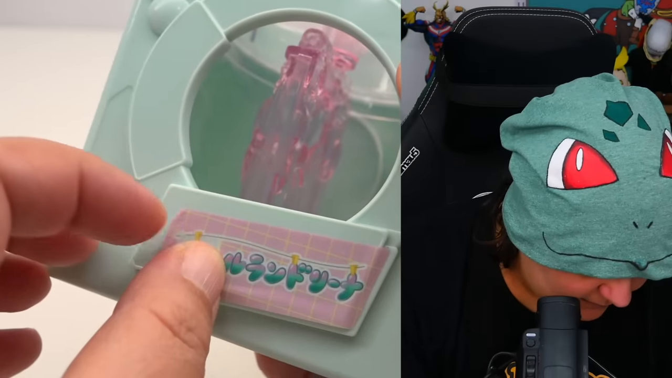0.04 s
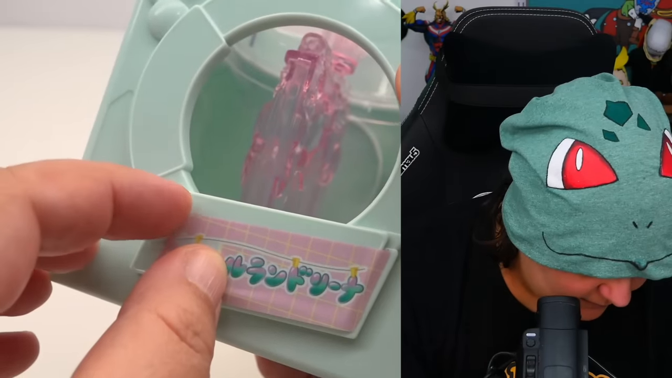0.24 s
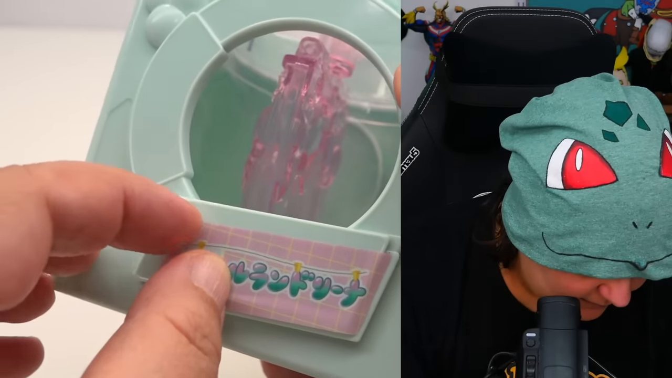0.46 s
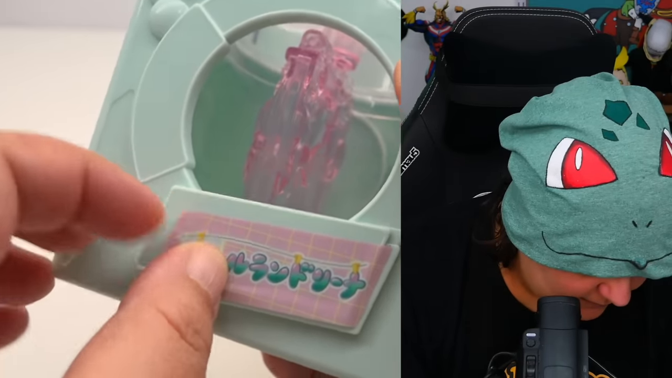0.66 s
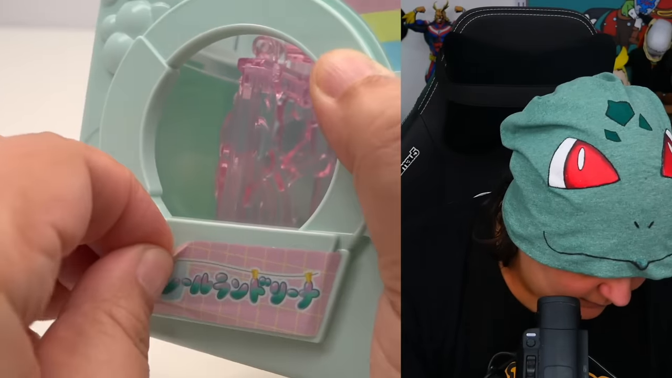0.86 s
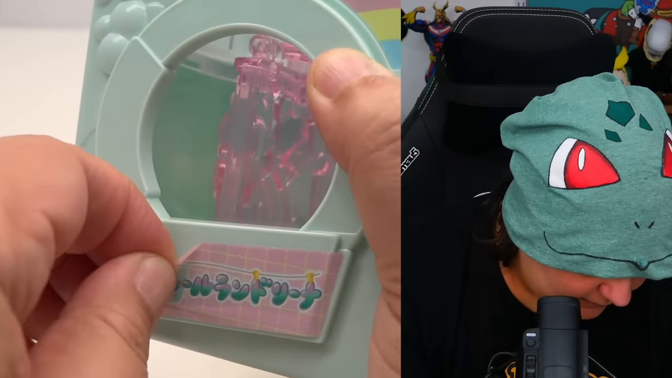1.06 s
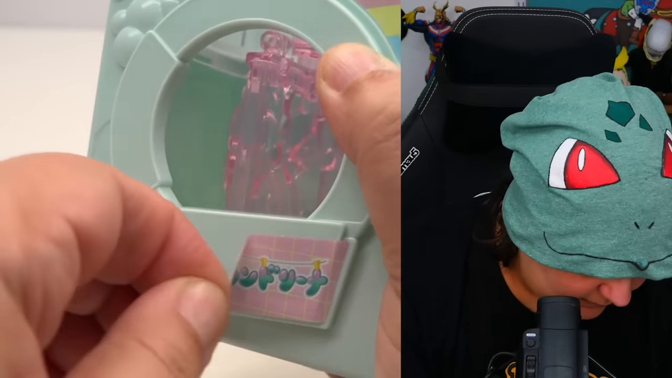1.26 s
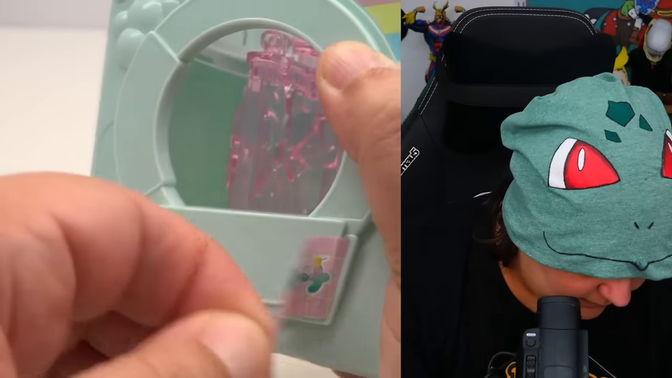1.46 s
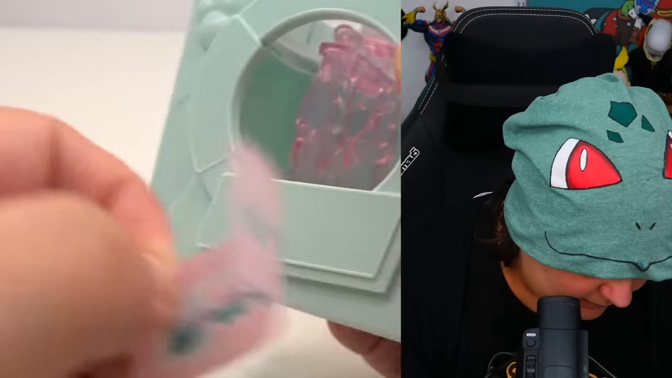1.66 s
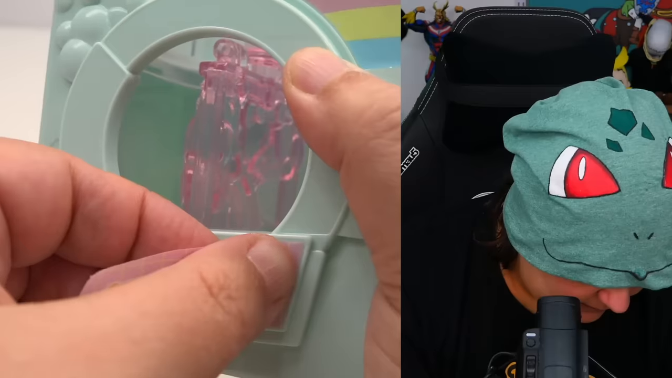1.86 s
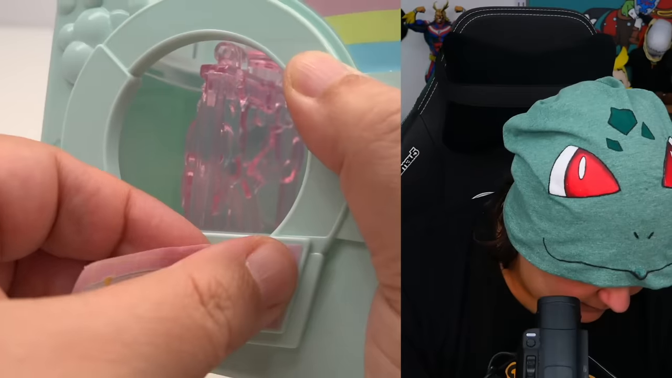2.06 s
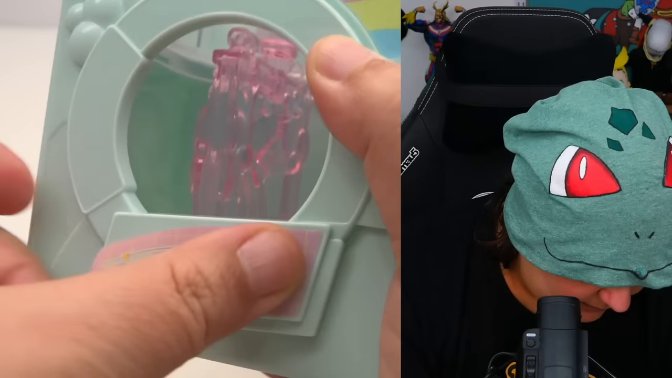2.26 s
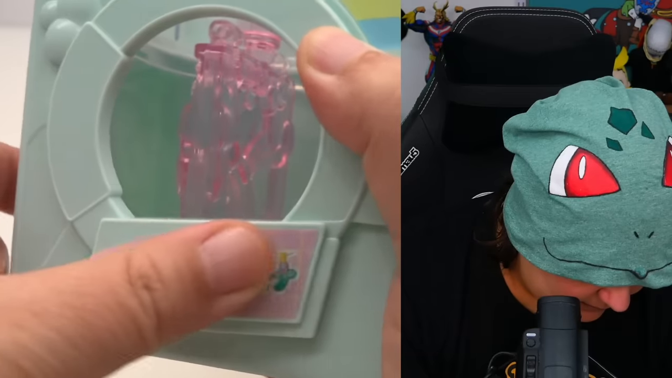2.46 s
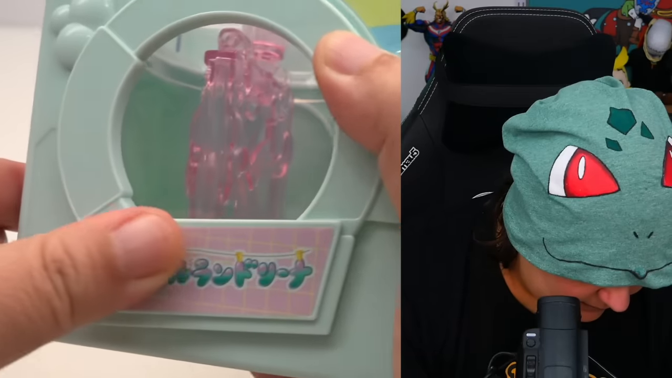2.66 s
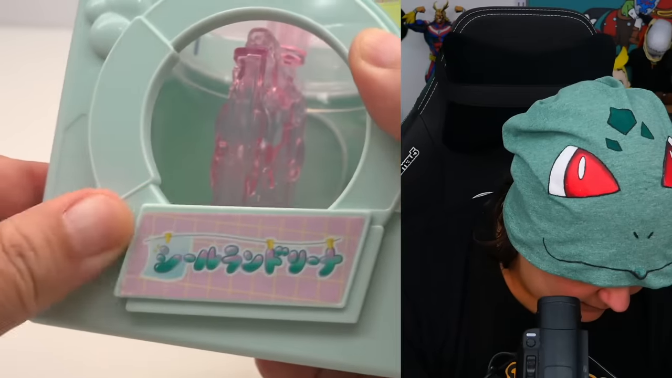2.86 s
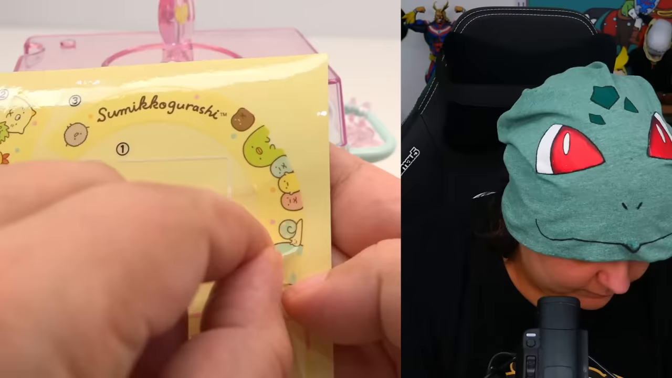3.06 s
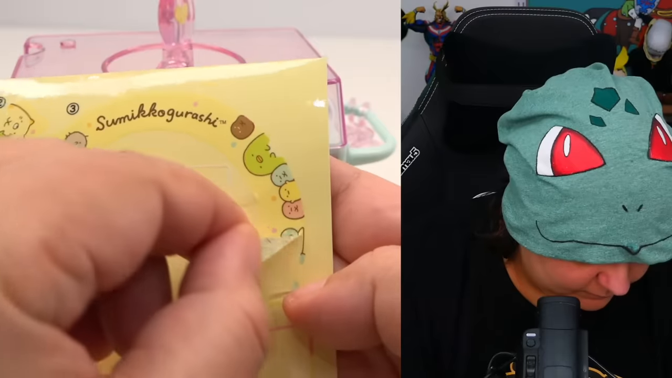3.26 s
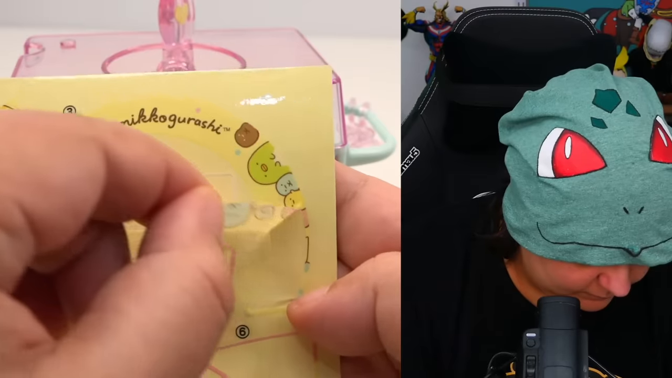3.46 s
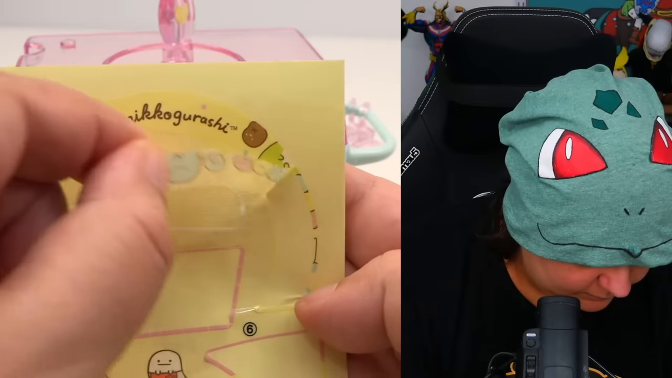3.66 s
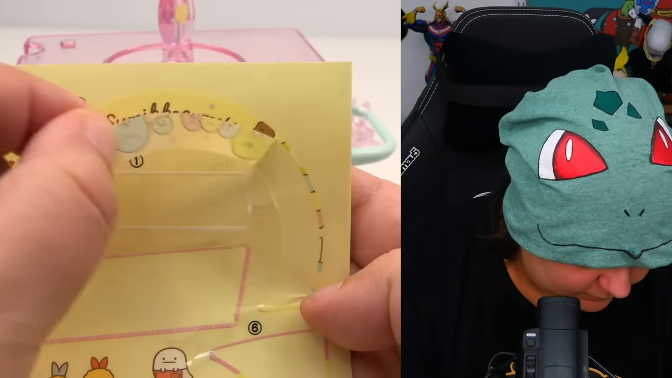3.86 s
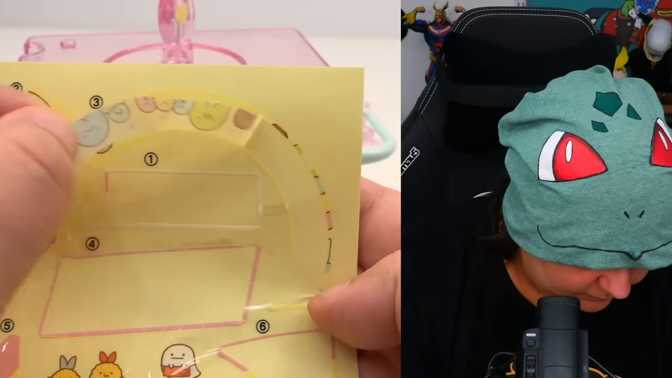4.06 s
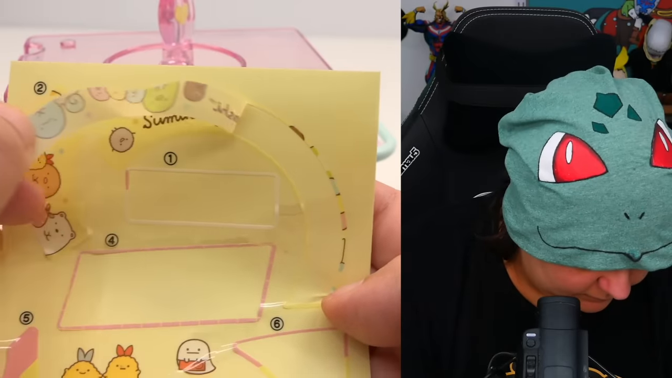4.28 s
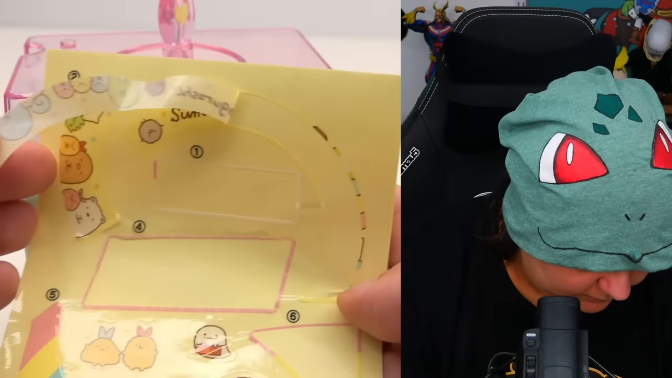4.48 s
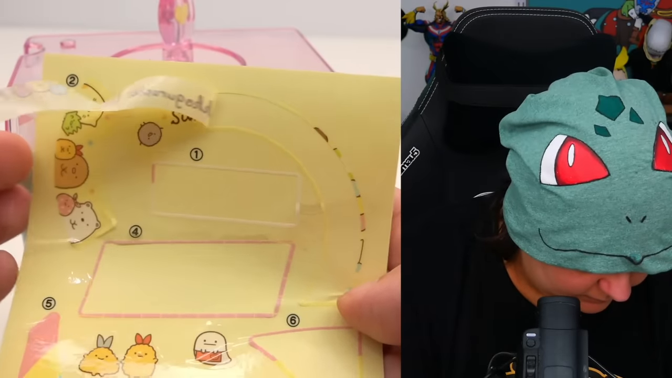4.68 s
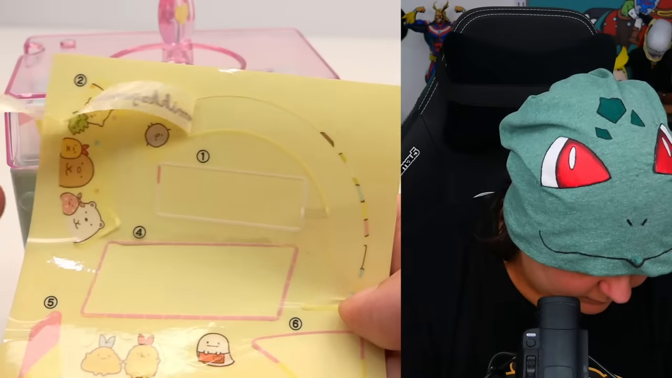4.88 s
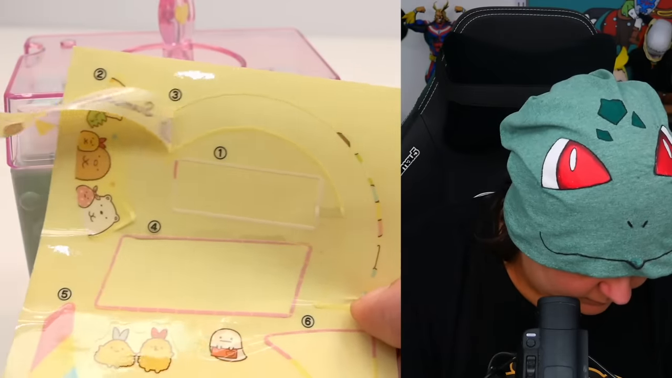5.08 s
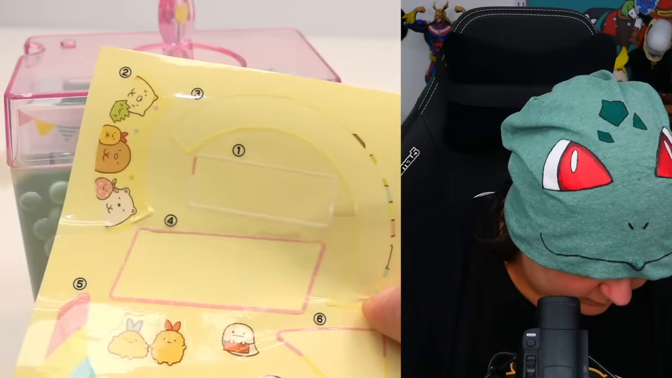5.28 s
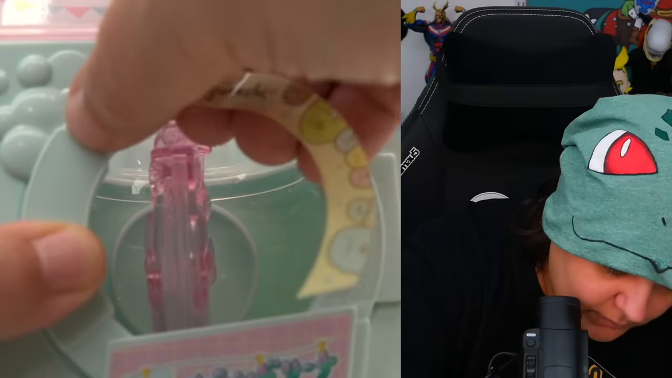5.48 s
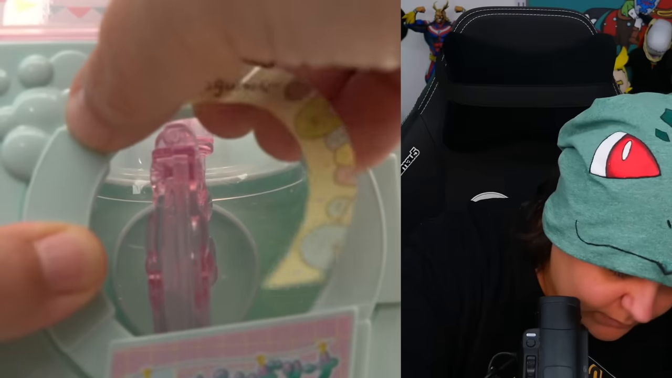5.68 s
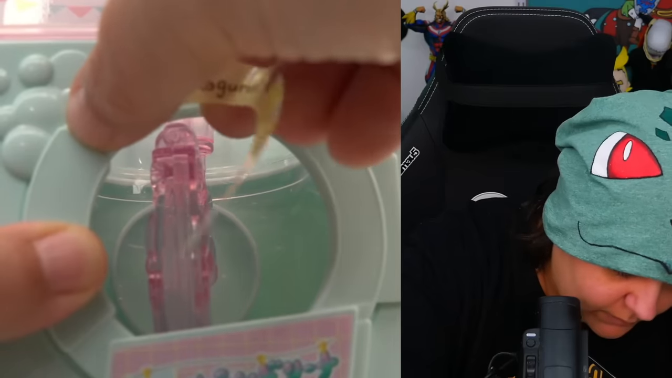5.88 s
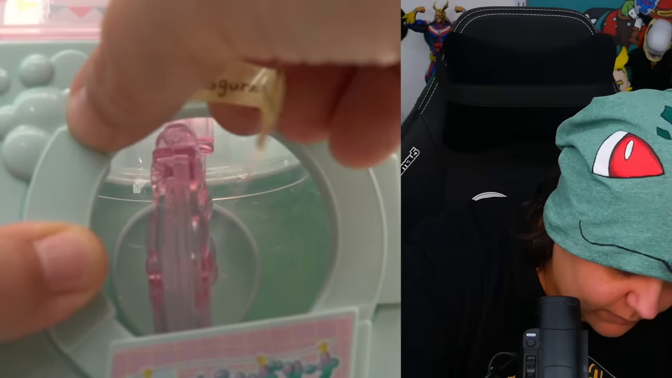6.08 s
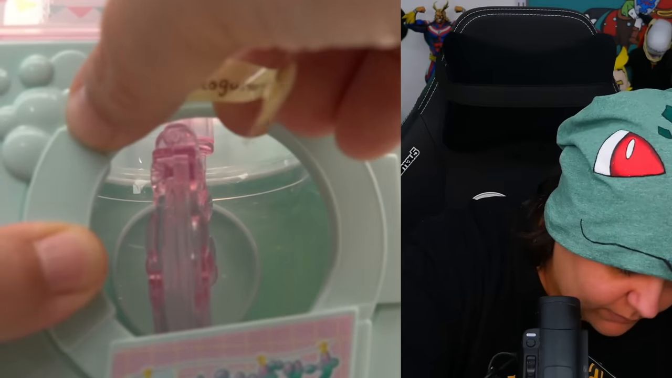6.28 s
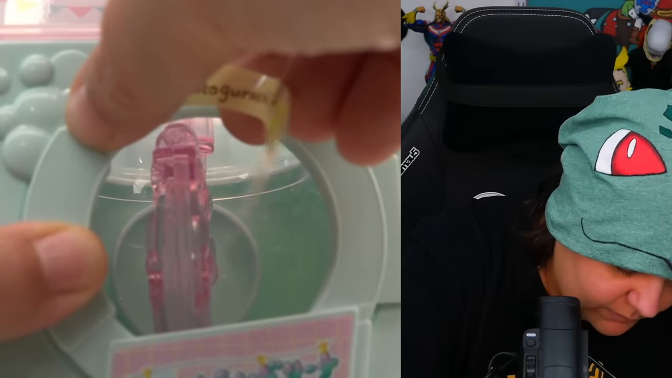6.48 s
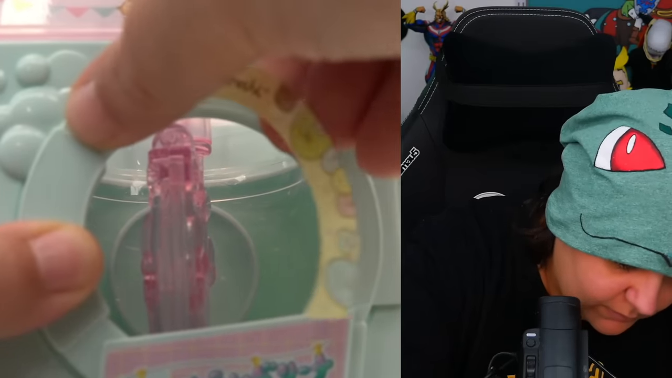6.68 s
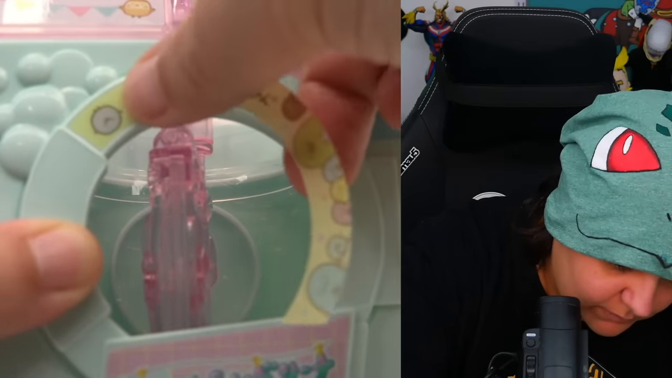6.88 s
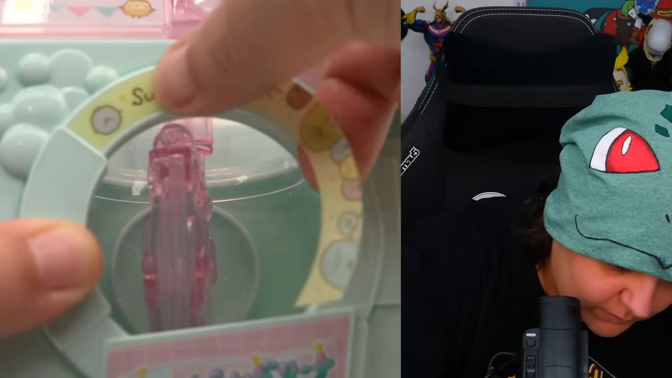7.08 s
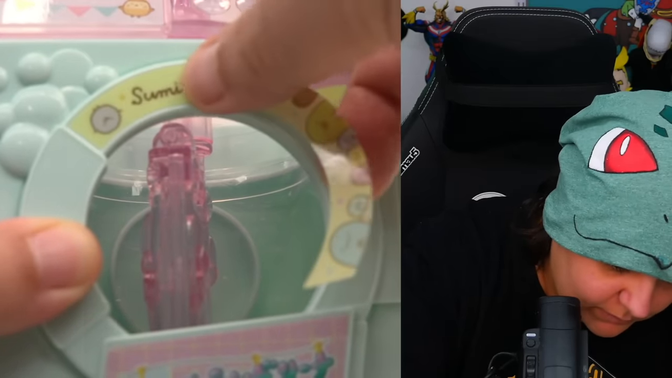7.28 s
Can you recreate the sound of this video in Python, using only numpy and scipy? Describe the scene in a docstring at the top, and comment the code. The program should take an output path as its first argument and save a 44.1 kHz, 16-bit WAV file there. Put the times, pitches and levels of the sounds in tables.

```python
"""A label is peeled off a hollow plastic toy close to a desk microphone, flicks free and is pressed back on.
A long sticker then lets go of its stiff backing sheet in a run of snaps, and the toy is picked up and bumped.
Breaking glue threads are random impulses and hiss, snaps and knocks are noise bursts through resonances,
rubbing fingers are tiny slips, and the desk booms as low sines. A small, dry room adds a tail and a floor."""
import sys
import numpy as np
from scipy import signal
from scipy.fft import rfft, irfft
from scipy.io import wavfile
from scipy.ndimage import uniform_filter1d

SR = 44100
rng = np.random.default_rng(int(sys.argv[2]) if len(sys.argv) > 2 else 0)


def transcribe(signal):
    """Save signal, clipped to [-1, 1], as a 16-bit WAV file at the path in sys.argv[1]."""
    frames = np.atleast_2d(signal).T
    limited = np.clip(frames, -1, 1)
    pcm = np.round(limited * 32767).astype(np.int16)
    wavfile.write(sys.argv[1], SR, pcm)


N = 323678
TIME = np.arange(N) / SR

# single snaps of glue and sheet, late film crinkles and a faint tick:
# [t/s, relative level/dB, body/dB, top/dB, resonance f/Hz]
SINGLE_SNAPS = [(1.161, 0.5, -20, 3, 4200), (1.183, -4, -22, 5, 4150), (1.1893, -3, -16, 0, 4100),
                (1.4394, -6, 2, 14.5, 1903), (1.52, 11, -3, -4, 5086), (3.1971, -2.5, 6.5, -16, 4440),
                (3.2282, -10, 2, 6, 5150), (3.234, 7, 6.5, -14.5, 5060), (3.258, 6, 8.5, -14, 5000),
                (3.275, -0.5, -10, -3, 5080), (3.282, 4.5, 8, -10, 4940), (3.299, -0.5, -5, -3, 5150),
                (3.307, -4.5, 10.5, -7, 4940), (3.341, -4, 12, -5, 1060), (3.3493, -4.5, 12, 0.5, 5100),
                (3.3934, -8, 6, -10, 5000), (3.43, -5, 2, 2.5, 5160), (3.486, 0, 11, 7.5, 4900),
                (3.5174, -5, -6, -8, 1018), (3.521, 0, -1, -7, 1020), (3.5582, -3, -19, 0, 4880),
                (3.6422, -0.5, -2, -2, 5100), (3.7005, -7.5, 10, 4.5, 4700), (3.8011, -5.5, 9, 0, 4900),
                (3.819, -8.5, 8, -1, 4790), (3.8701, -5.5, 5, 11.5, 3100), (3.902, -8, -1, 9.5, 3040),
                (3.937, -9, 2.5, 1, 1240), (3.9682, -7, 4, 9, 5000), (4.111, -5.5, -1, 5.5, 1500),
                (4.1784, -8, -8, -4, 1130), (4.2029, -5.5, -3.5, -6, 1130), (4.2614, -8, 8, 2, 3770),
                (4.3114, -8.5, 8, 3.5, 2000), (4.4072, -10, 9, 6.5, 3640), (4.4691, -11, 5.5, 1, 1510),
                (4.6911, -11.5, 4, 5, 1120), (4.7858, -7, 0, -1, 3900), (4.8007, -7, 1, 1, 1090),
                (4.8604, -2, 0, -3, 1050), (4.927, -10, -3, -4, 1050), (4.9382, 0.5, -2, -1, 1040),
                (4.9918, -9, 17, 4, 3750), (5.0513, -5, 5, -3, 1000), (5.058, -3, 0.5, -5, 1000),
                (5.1635, -0.5, -5, -1, 2654), (5.344, -9.5, 2, -6, 5150), (5.4328, -5, -25, 5.5, 9500),
                (5.684, -18, -16, 7, 4970), (5.696, -22, -10, 10, 7600), (6.8016, -24.5, 19, 8, 4590)]
# colour of the stiff backing sheet: [f/Hz, level/dB]
SHEET_COLOUR = [(200, -9), (700, -5), (1100, 5), (1700, -2.5), (3000, 1), (4800, -3), (6500, -9.5),
                (8400, -11.5), (11000, -21), (16000, -23)]


def label_peel():
    """The label's breaking glue threads ring the panel that it is stuck to."""
    # pulls that lift the label, then lay it back: [start t/s, hold/s, relative level/dB, top/dB]
    pulls = [(0.77, 0.17, -51, 3), (.99, 0.05, -51, 5), (1.07, .09, -44.5, 4), (1.19, 0.032, -37, -7),
             (1.25, 0.16, -46, -7), (1.48, 0.016, -31.5, -0.5), (1.535, 0.084, -46.5, 3),
             (2.01, 0.082, -50.5, -6), (2.1, 0.12, -44.5, -6)]
    # colour of the label: [f/Hz, level/dB]
    label_colour = [(300, -15.5), (1100, -4), (1650, -13), (2400, -6.5), (3700, -8.5), (5200, -5.5),
                    (7000, -8.5), (10500, -15), (14500, -8.5), (16000, -19)]
    # resonances of the label and the panel under it: [f/Hz, lift/dB, Q]
    panel = [(1984, 15.5, 13), (3305, 11, 30), (4380, 7.5, 17), (8470, 10.5, 5.6)]
    pull, top_db = strokes(pulls, attack_s=0.027, release_s=0.024)
    x = peel(pull, top_db, label_colour, threads_per_s=1100, spread_db=2.5, hiss_db=-1.5, judder_db=2.0)
    for hz, db, q in panel:
        x = resonate(x, hz, db, q)
    return amp(-7.0) * x


def sheet_peel():
    """The long sticker crackles off its stiff backing in long, steady pulls with short scrapes on top."""
    # pulls and scrapes that draw the sticker off: [start t/s, hold/s, relative level/dB, top/dB]
    pulls = [(3.11, 0.12, -55, 0), (3.22, 0.43, -47.5, 10), (3.285, 0.025, -37.5, 4), (3.62, 0.94, -54, 6),
             (4.06, 0.05, -48, -12), (4.4, .035, -49, -3), (4.61, .015, -43, 11), (4.672, 0.028, -36, -1),
             (4.95, 0.197, -43, 3), (5.1, 0.016, -38, 10), (5.163, 0.016, -33, 1)]
    pull, top_db = strokes(pulls, attack_s=0.0082, release_s=0.0064)
    x = peel(pull, top_db, SHEET_COLOUR, threads_per_s=380, spread_db=3, hiss_db=-4.5, judder_db=5)
    return amp(-5.5) * x


def peel(pull, top_db, shape, threads_per_s, spread_db, hiss_db, judder_db):
    """Glue threads break one by one and shake the film; the finest merge into a hiss, and the pull judders."""
    breaks = grains(threads_per_s, spread_db) + amp(hiss_db) * rng.standard_normal(N)
    judder = amp(judder_db * walk(110))
    crackle = unit(colour(judder * breaks, shape))
    return brighten(crackle, top_db) * pull


def snaps():
    """A patch of glue lets go: a tiny tear, a millisecond flutter, then waves running round the sheet."""
    # colour common to all snaps: [f/Hz, level/dB]
    snap_colour = [(60, -31), (300, -19.5), (700, -20.5), (1100, -9.5), (1700, -14), (3000, -6.5),
                   (5000, -6.5), (6500, -9), (8400, -7), (11000, -22), (16000, -23)]
    tear_s, spike = 0.00027, 0.69
    flutter_s, flutter_db = 0.0052, -6.5
    tail_s, tail_db = 0.0064, -13
    gain_db, ring_db, ring_q = -1, 10.5, 7
    out = np.zeros(N)
    for s, db, body_db, top_db, hz in SINGLE_SNAPS + faint_snaps():
        tear = burst(tear_s, size=3000)
        tear[0] += spike
        flutter = amp(flutter_db) * burst(flutter_s, size=3000)
        tail = amp(tail_db) * burst(tail_s, size=3000)
        kick = tear / np.linalg.norm(tear) + flutter + tail
        snap = colour(kick, snap_colour, [(1300, body_db), (4000, 0), (10500, top_db)])
        add(out, s, amp(db + gain_db) * resonate(snap, hz, ring_db, ring_q))
    return trail(out, hz=2500, q=0.94)  # bending waves delay this band


def faint_snaps():
    """Rows like SINGLE_SNAPS for small glue patches that let go at random, fewer and weaker as the peel goes on."""
    start_s, end_s, count, thinning = 3.17, 5.25, 100, 1.2
    level_db, fade_db_per_s, level_spread_db = -13.5, -4.5, 1.5
    body_db, top_db, colour_spread_db = 4, 1, 5
    # the freed strip rings lower the longer it gets
    strip_hz, strip_hold_s, octaves_per_s, scatter_octaves_per_s = 5000, 0.59, 1.59, 1.2
    gap_s = 0.012  # a short gap without faint snaps before each listed snap

    place = (np.arange(count) + rng.random(count)) / count
    size, body, top, pitch = rng.standard_normal((count, 4)).T
    age_s = (end_s - start_s) * place ** thinning
    octaves = np.maximum(age_s - strip_hold_s, 0) * (octaves_per_s + scatter_octaves_per_s * pitch)
    rows = zip(start_s + age_s,
               level_db + fade_db_per_s * age_s + level_spread_db * size,
               body_db + colour_spread_db * body,
               top_db + colour_spread_db * top,
               strip_hz / 2 ** np.clip(octaves, 0, 2.2))
    return [row for row in rows if not any(0 < listed[0] - row[0] < gap_s for listed in SINGLE_SNAPS)]


def buckle():
    """The bent sheet pops through to its other curve once: a short, hollow tock that spreads over the paper."""
    # modes of the buckling sheet: [f/Hz, level/dB, t60/s]
    modes = [(270, -38.5, 0.044), (610, -36, 0.022), (1077, -11.5, 0.013), (1460, -31, 0.042),
             (2290, -34, 0.018)]
    buckle_s, crack_db, scatter_db, scatter_s = 3.5408, -19, -10, 0.0064
    t, out = TIME[:4000], np.zeros(N)
    pop = sum(amp(db - 60 * t / t60) * np.sin(2 * np.pi * hz * t) for hz, db, t60 in modes)
    scatter = signal.fftconvolve(pop, burst(scatter_s, size=4000))[:len(t)]
    pop = pop + amp(scatter_db) * scatter
    # a light sheet radiates no deep bass
    pop = colour(pop, [(40, -37), (200, -3.0), (500, -5.5), (2600, 5.5), (4000, -15), (10000, -10)])
    crack = amp(crack_db) * colour(burst(.002, size=4000), SHEET_COLOUR)
    add(out, buckle_s, pop + crack)
    return out


def label_slide():
    """The sliding label swishes with a resonance that falls as more of it hangs free, ragged at its edges."""
    # swishes over plastic and skin: [start t/s, hold/s, level/dB]
    swishes = [(1.07, 0.06, -51.5), (1.19, 0.02, -37.5), (1.25, 0.033, -48), (1.43, 0.034, -45.5),
               (1.55, 0.006, -30), (1.6, 0.029, -43.5), (1.69, 0.025, -55), (2.1, .06, -64),
               (2.82, 0.034, -66)]
    # the free length grows from lift_s on, until the label flicks off at free_s
    lift_s, free_s, length_doubling_s = 1.165, 1.515, .085
    stuck_hz, free_hz = 8310, 5530
    slip_db, half_width_hz, skirt_hz, skirt_db = 3, 480, 1900, -7
    gain, = strokes(swishes, attack_s=0.029, release_s=0.024)
    free_length = 1 + np.maximum(TIME - lift_s, 0) / length_doubling_s
    hz = np.where(TIME < free_s, stuck_hz / free_length, free_hz)

    noise = rng.standard_normal(N) + 1j * rng.standard_normal(N)
    friction = amp(slip_db * walk(150)) * noise
    core, skirt = (signal.sosfilt(signal.butter(2, width, fs=SR, output="sos"), friction)
                   for width in (half_width_hz, skirt_hz))
    sway = core + amp(skirt_db) * np.roll(skirt, SR)  # the shift makes the skirt independent of the core
    # move the low band up to the resonance
    carrier = np.exp(2j * np.pi * np.cumsum(hz) / SR)
    return unit(np.real(sway * carrier)) * gain


def film_flex():
    """The loose sticker creeps over a fingertip in an uneven run of tiny slips."""
    # flexing in the fingers: [t/s, level/dB, top/dB]
    flexing = [(5.4, -61, 9), (5.45, -63, 11), (5.5, -74, 12), (5.56, -67, 9), (5.62, -50, -7),
               (5.66, -56.5, 1), (5.7, -72, 3), (5.76, -61, -12), (5.82, -77, 3)]
    # colour of the thin film: [f/Hz, level/dB]
    film_colour = [(800, -28), (2000, -20), (3800, -22), (5070, 2), (6040, -8), (7700, -2), (10700, -17),
                   (16000, -20)]
    slips_per_s, scatter_db, hiss_db = 110, 6.0, -8
    s, *columns = np.transpose(flexing)
    level_db, top_db = (np.interp(TIME, s, column) for column in columns)
    lasting = uniform_filter1d(1. * ((TIME >= s[0]) & (TIME <= s[-1])), size=400)  # soft edges

    cycles = np.floor(np.cumsum(slips_per_s * np.exp(0.5 * walk(81))) / SR)
    slips = unit(np.diff(cycles, prepend=0) * amp(scatter_db * walk(300)))
    x = unit(colour(slips + amp(hiss_db) * rng.standard_normal(N), film_colour))
    return brighten(x, top_db) * amp(level_db) * lasting


def knocks():
    """A brief contact, then loose parts chatter; each spot has its pitch, and soft flesh dulls the treble."""
    # blows on the toy:
    # [t/s, relative level/dB, bass/dB, low middle/dB, top/dB, resonance f/Hz, rattle decay/s]
    blows = [(0.3626, -17.5, 3, -11, -12.5, 1000, 0.024), (0.4197, -17, 15, 5.5, -33, 960, 0.0088),
             (0.5208, 9.5, 4, -6, -25.5, 856, 0.014), (0.568, -7.5, -16, 4, -30, 670, .009),
             (0.592, -10.5, 1, 10, -35, 747, 0.013), (0.629, -12, -8, 9, -27, 1320, 0.011),
             (1.4563, 11, -14, -12.5, -8, 2000, 0.012), (1.5286, 0.5, -1.5, 6, 4.5, 1780, 0.02),
             (1.7513, -11, -2, -10, -17, 2310, 0.0096), (2.1234, 8.5, -20, -11.5, -12.5, 2100, 0.0027),
             (2.1309, 6.5, -19, 3.5, -16, 1040, 0.0081), (2.21, -2.5, -3.5, 5.5, -2.5, 1290, .01),
             (2.225, -5, -8, 4, -11, 1320, 0.011), (2.2383, -4, -6, -1, -22, 2950, 0.0029),
             (2.2748, -11, -2, -15, -37, 1330, .007), (2.322, -10.5, -16, 9, -27, 3140, 0.0088),
             (2.3384, -12, -11, 1, -40, 1060, 0.0081), (2.3712, -11.5, -9, 8, -38, 1310, 0.022),
             (2.4015, -0.5, -24, 3.5, -42, 1024, 0.01), (2.4628, -1, -12, 5.5, -31, 3420, 0.0088),
             (2.4948, -14.5, 3, -3, -15, 3400, 0.013), (2.528, -10, -14, 1.5, -26, 437, 0.034),
             (2.547, -19, -8, -2, -14, 2580, 0.022), (2.6269, -16.5, 5, 7, -23, 770, 0.013),
             (2.6997, -15.5, -1, 3, -29, 3170, .006), (2.824, -21.5, -2, 14, -18, 793, 0.01),
             (2.85, -14.5, -5, 4, -14, 990, 0.043), (5.155, -6, 6, 4.5, -31, 410, 0.0066),
             (5.408, -18, 14, 12, -30, 930, .008), (5.4317, -6.5, 20, 3, -22, 890, 0.024),
             (5.453, -4.5, 10.5, 0.5, -46, 503, 0.0097), (5.7216, -5.5, 17.5, 4, -11.5, 960, 0.016),
             (5.756, -15.5, 13, 6, -32, 397, 0.0077), (6.591, 5.5, 19, 4, -6, 422, .016),
             (6.651, -11, -6, 6, -34, 1000, 0.0089), (6.688, -17.5, 11, 11, -45, 1220, .007),
             (7.193, -29, 22, 15, -25, 396, 0.0091)]
    contact_s, spike, rattle_db, rough, chatter_db = 0.0035, 0.44, 6, 0.29, 4
    gain_db, ring_db, ring_q, upper_share = -2, 13.0, 12, 0.33
    # spots that ring above rim_hz lie on the stiff rim and ring more clearly
    rim_hz, rim_db = 2500, 3
    out = np.zeros(N)
    chatter = amp(chatter_db * walk(260))
    for s, db, bass_db, low_db, top_db, hz, decay_s in blows:
        chatter_here = np.roll(chatter, -int(s * SR))[:8000]
        rattle = burst(decay_s, size=8000, rough=rough) * chatter_here
        push = burst(contact_s, size=8000) + amp(rattle_db) * rattle / np.linalg.norm(rattle)
        push[0] += spike
        shape = [(55, bass_db - 27.5), (125, bass_db), (480, low_db), (1100, 0.016),
                 (3000, upper_share * top_db), (10000, top_db), (16000, top_db - 13)]
        blow = colour(push / np.linalg.norm(push), shape)
        spot_db = ring_db + rim_db * (hz > rim_hz)
        add(out, s, amp(db + gain_db) * resonate(blow, hz, spot_db, ring_q))
    # the heavy desk answers a few milliseconds late
    return shell(trail(out, hz=130, q=1.76), ring_db=-7.0)


def shell(x, ring_db):
    """The hollow toy adds its modes to whatever shakes it."""
    # ringing of the toy's shell: [f/Hz, relative level/dB, t60/s]
    modes = [(212, 4.5, 0.21), (456, 5.5, 0.21), (656, -2, 0.13), (968, -6.5, 0.045), (1132, 3.5, 0.035),
             (1315, 7, 0.16), (1850, -15, 0.3), (1980, 6, 0.06), (2490, 8.5, 0.18)]
    t, ring = TIME[:SR // 4], 0
    for hz, db, t60 in modes:
        rate = np.log(1000) / t60
        ring = ring + amp(db) * 2 * rate / SR * np.exp(-rate * t) * np.cos(2 * np.pi * hz * t)
    return x + amp(ring_db) * signal.fftconvolve(x, ring)[:N]


def fingers():
    """Skin grips and slips in tiny jerks on plastic and paper; the hollow body answers lower down."""
    # fingers shifting their grip: [start t/s, hold/s, relative rub level/dB, hollow body against rub/dB]
    shifts = [(0.56, 0.024, -47.5, -14), (0.86, 0.014, -49, -4), (1.21, 0.046, -58.5, 14),
              (1.49, 0.013, -40.5, -5), (1.6, 0.043, -46, -4), (2.23, 0.073, -49.5, -2),
              (2.54, 0.2, -55, -5), (2.82, 0.042, -52, -2), (3.3, 0.14, -53.5, -11), (4.08, .02, -55, -7),
              (4.39, .04, -53.5, -9), (4.67, 0.023, -54.5, 2), (5.0, .13, -44, 0.5), (5.44, 0.22, -62, 5),
              (5.75, 0.036, -56, 8), (6.65, .03, -62, 7), (7.19, 0.081, -74, 13)]
    # colours of the rub and of the hollow body: [f/Hz, level/dB]
    rub_colour = [(200, -26), (500, -3.5), (750, 2), (1100, -1.5), (1400, -12), (1800, -11), (4000, -28)]
    hollow_colour = [(60, -10.5), (130, -1), (220, -7), (330, 4), (450, -2.5), (700, -5.5), (1500, -31.5)]
    rub_gain_db, hollow_gain_db = -5.5, -4.0
    slips_per_s, spread_db, hiss_db = 260, 3, -6
    # under the shifts the holding fingers creep faintly, less once the toy is held still
    creep_rub_db, creep_hollow_db, creep_wander_db, creep_per_s = -61.5, -61, 3.5, 6
    still_s, still_db = 5.9, -4

    shift, body_db = strokes(shifts, attack_s=.025, release_s=0.034)
    creep = amp(creep_wander_db * walk(creep_per_s) + still_db * (TIME > still_s))
    slips = grains(slips_per_s, spread_db) + amp(hiss_db) * rng.standard_normal(N)
    slips = shell(slips, ring_db=-1.5)
    rub = unit(colour(slips, rub_colour))
    hollow = unit(colour(slips, hollow_colour))
    rub_level = amp(rub_gain_db) * np.hypot(shift, amp(creep_rub_db) * creep)
    hollow_level = amp(hollow_gain_db) * np.hypot(amp(body_db) * shift, amp(creep_hollow_db) * creep)
    return rub_level * rub + hollow_level * hollow


def booms():
    """Slow pushes of the hands swell a low, wavering resonance of the desk."""
    # soft booms of hands and desk: [middle t/s, f/Hz, level/dB, length/s]
    pushes = [(.539, 73, -52, .076), (2.235, 48, -56, .067), (3.115, 122, -53, .15), (3.367, 77, -60, .08),
              (3.48, 129.4, -53.5, .1), (3.73, 127, -52.5, .33), (4.02, 130.6, -53.5, .11),
              (4.40, 137, -53.5, .22), (4.72, 115.3, -58.5, .11), (5.051, 109.3, -60, .19),
              (5.51, 128.8, -50, .2), (6.635, 129, -43, 0.094), (6.74, 128.8, -59.5, .18)]
    out, drift = np.zeros(N), 1 + 0.061 * walk(50)
    for s, hz, db, length_s in pushes:
        swell = np.hanning(int(length_s * SR))
        phase = 2 * np.pi * hz * np.cumsum(drift[int(s * SR):][:len(swell)]) / SR
        add(out, s - length_s / 2, np.sqrt(2) * amp(db) * swell * np.sin(phase))
    return out


def reflections(x):
    """Scattering off hands and toy; its pattern keeps changing as they move."""
    turn = np.pi * walk(5)
    first, second = (signal.fftconvolve(x, burst(0.0046, size=4000))[:N] for _ in range(2))
    return np.cos(turn) * first + np.sin(turn) * second


def room(x):
    """Desk and near walls send back a short, diffuse tail."""
    # colour of the tail: [f/Hz, level/dB]
    room_colour = [(60, -10), (130, 2), (400, 4), (1200, -2.5), (2500, 1), (5000, 0.5), (8000, -3.5),
                   (12000, -1.5), (16000, -19.5)]
    t60_s, gap_s, level_db = 0.36, 0.004, -11.5
    tail = colour(burst(t60_s / np.log(1000), size=22000, rough=0.24), room_colour)
    out = np.zeros(N)
    add(out, gap_s, signal.fftconvolve(x, tail)[:N])
    return amp(level_db) * out


def floor():
    """Low room rumble and microphone hiss: coloured noise with a very slight wander in level."""
    # colour of the floor: [f/Hz, level/dB]
    floor_colour = [(15, -52), (25, -5), (59, -7), (80, -1), (127, 5), (149, -1.5), (270, -1), (363, -6),
                    (405, -8), (560, -17.5), (607, -10), (1370, -16.5), (2480, -21), (5140, -21),
                    (16000, -26)]
    return amp(-59.5 + 0.1 * walk(2.77)) * unit(colour(rng.standard_normal(N), floor_colour))


def amp(db):
    """Decibels to gain."""
    return 10 ** (np.asarray(db) / 20)


def unit(x):
    """Scale to rms 1."""
    return x / np.sqrt(np.mean(x ** 2))


def add(out, s, x):
    """Mix x into out from time s on."""
    i = max(int(s * SR), 0)
    out[i:i + len(x)] += x[:N - i]


def walk(rate):
    """Random wander of spread near 1, in straight lines between rate knots a second."""
    knots = rng.standard_normal(4096)
    return np.interp(TIME * rate, np.arange(len(knots)), knots)


def burst(decay_s, size, rough=0.):
    """Dying noise of energy 1; roughness breaks it into tiny contacts."""
    noise, lumps = rng.standard_normal((2, size))
    x = noise * np.exp(rough * lumps - np.arange(size) / SR / max(decay_s, 1 / SR))
    return x / np.sqrt(np.sum(x ** 2))


def grains(per_s, spread_db):
    """Random tiny impulses, a few much larger than the rest; rms 1."""
    size_db = spread_db * np.minimum(rng.exponential(size=N), 3)
    impulses = amp(size_db) * rng.choice([-1, 1], N)
    return unit(impulses * (rng.random(N) < per_s / SR))


def strokes(table, attack_s, release_s):
    """Hand strokes swell, hold and die away: their joint gain, then further columns led by the loudest stroke."""
    start, hold, db, *columns = np.transpose(table)[:, :, None]
    fade = np.maximum(start - TIME, 0) / attack_s + np.maximum(TIME - start - hold, 0) / release_s
    power = (amp(db) * np.exp(-np.minimum(fade, 20))) ** 2
    total = power.sum(axis=0)
    return [np.sqrt(total)] + [(power * c).sum(axis=0) / total for c in columns]


def response(*shapes, size=2048):
    """Causal, minimum-phase impulse response of one or more (Hz, dB) shapes in series."""
    hz = np.maximum(np.arange(size // 2 + 1) * SR / size, 1)
    db = sum(np.interp(np.log(hz), np.log(np.array(p)[:, 0]), np.array(p)[:, 1]) for p in shapes)
    # folding the cepstrum forward in time makes the response causal
    cepstrum = irfft(np.log(amp(db)))
    cepstrum[1:size // 2] *= 2
    cepstrum[size // 2 + 1:] = 0
    return irfft(np.exp(rfft(cepstrum)))


def colour(x, *shapes):
    """Filter x by (Hz, dB) shapes."""
    return signal.fftconvolve(x, response(*shapes))[:len(x)]


def resonate(x, hz, db, q):
    """Lift one resonance out of x."""
    b, a = signal.iirpeak(hz, q, fs=SR)
    return x + (amp(db) - 1) * signal.lfilter(b, a, x)


def trail(x, hz, q):
    """All-pass: the band round hz arrives later than the rest."""
    b, a = signal.iirpeak(hz, q, fs=SR)
    return x - 2 * signal.lfilter(b, a, x)


def brighten(x, top_db):
    """Raise or lower the highest treble."""
    dull = signal.sosfiltfilt(signal.butter(2, 9000, fs=SR, output="sos"), x)
    return dull + amp(top_db) * (x - dull)


def scene():
    """All sources sit just left of centre; scattered reflections, mostly treble, spread between the ears."""
    # colour of the spread between the ears: [f/Hz, level/dB]
    side_colour = [(25, -10), (60, -16.5), (200, -12), (600, -8), (1500, -17), (3000, -27), (5500, -16),
                   (7000, -1), (8300, -1.5), (9500, -3.5), (11000, 3), (16000, -28)]
    # how much of the sound leans to the left: [f/Hz, level/dB]
    lean_colour = [(60, -36), (130, -21), (500, -25.5), (1100, -25), (2200, -37), (5000, -31),
                   (8300, -13.5), (12000, -23)]
    peeling = label_peel() + sheet_peel() + snaps() + buckle()
    handling = label_slide() + film_flex() + knocks() + fingers() + booms()
    near = peeling + handling
    mid = near + room(near) + floor()
    spread = colour(amp(-5.0) * reflections(near) + amp(1.0) * floor(), side_colour)
    side = spread + colour(mid, lean_colour)
    return np.array([mid + side, mid - side])


def record(dry):
    """The recorder cuts the top above 16.1 kHz with a steep low-pass."""
    return signal.sosfilt(signal.ellip(10, .2, 70, 16100, fs=SR, output="sos"), dry)


dry = scene()
out = record(dry)
transcribe(out)
```